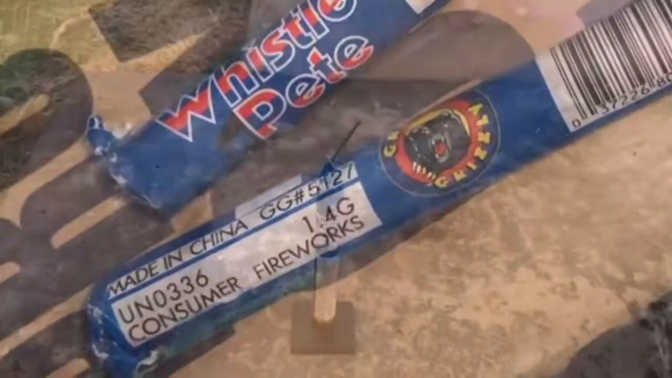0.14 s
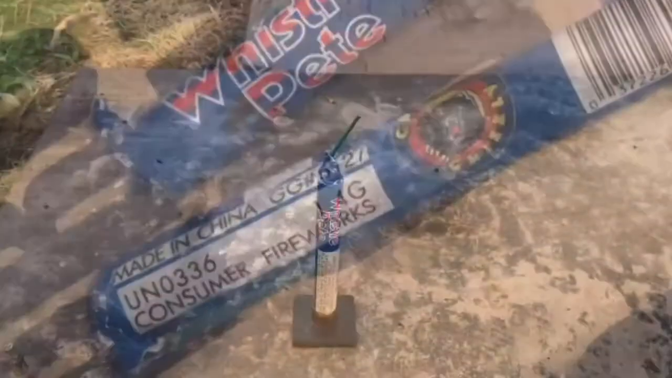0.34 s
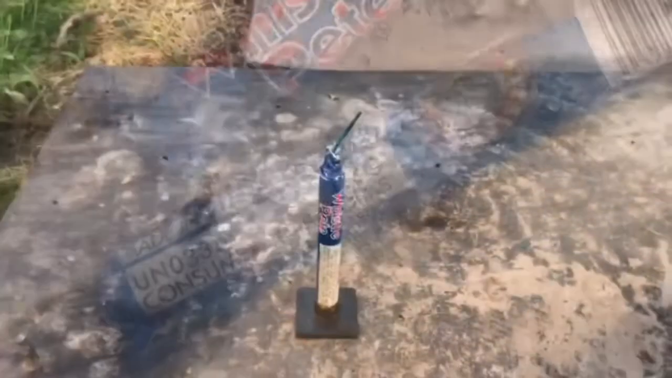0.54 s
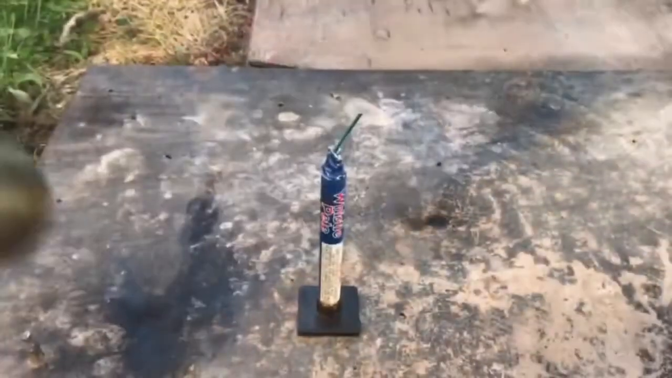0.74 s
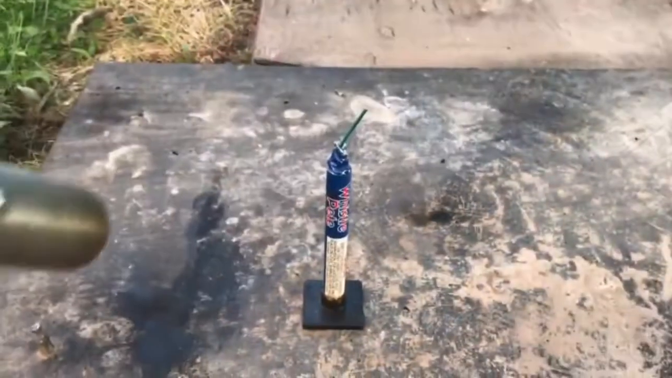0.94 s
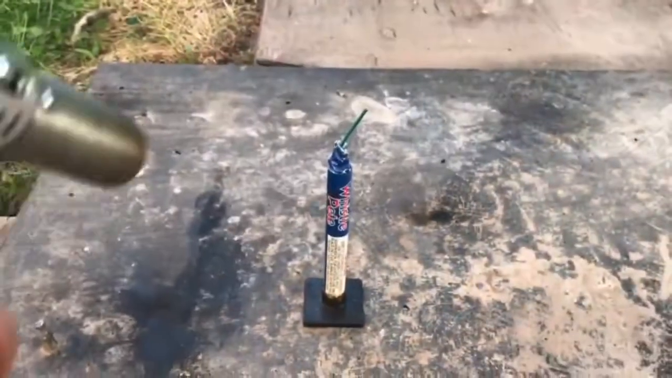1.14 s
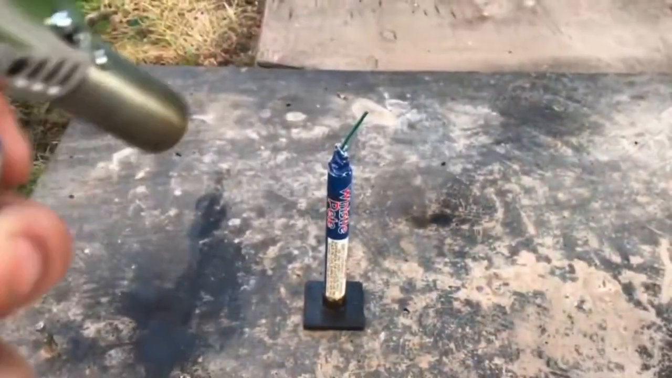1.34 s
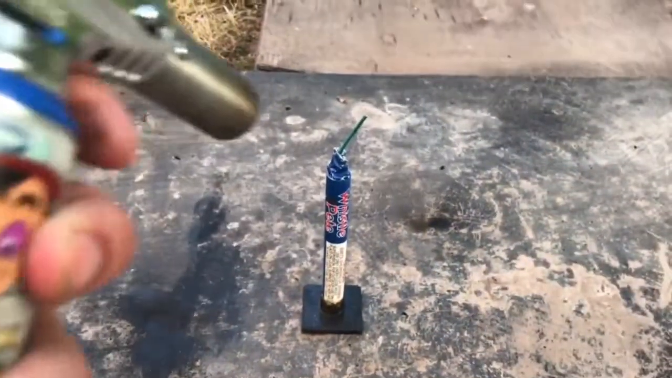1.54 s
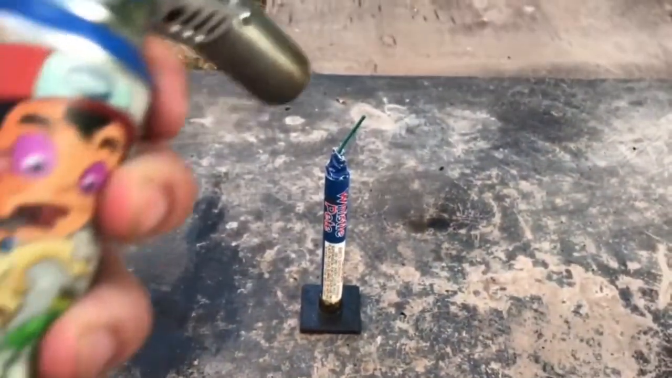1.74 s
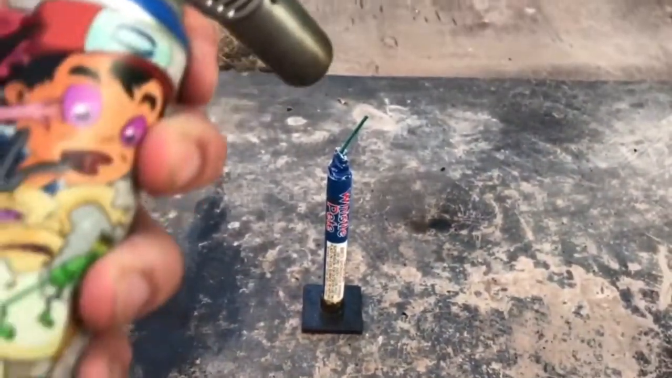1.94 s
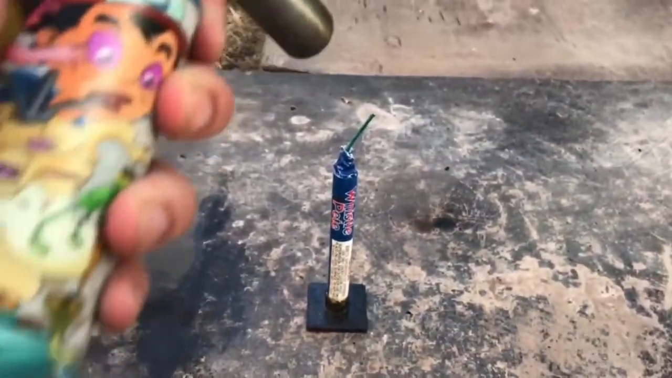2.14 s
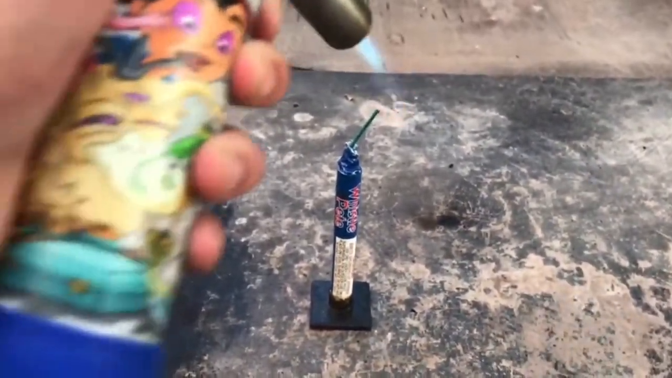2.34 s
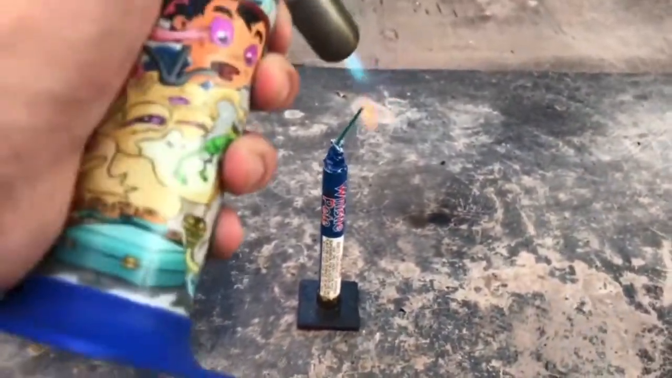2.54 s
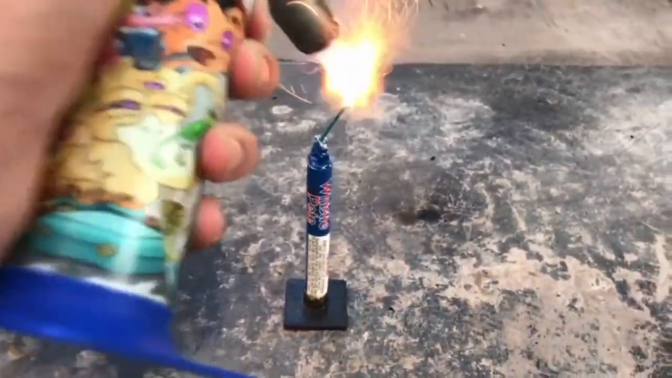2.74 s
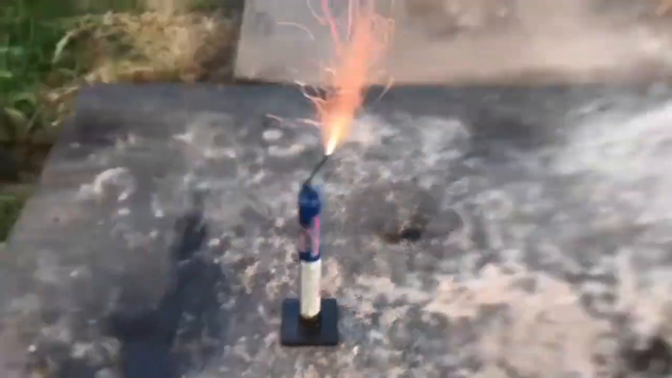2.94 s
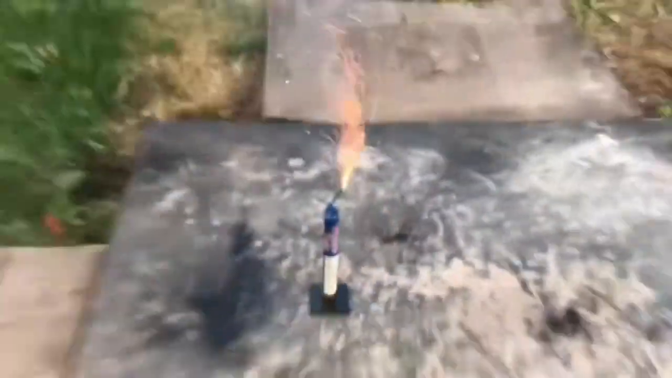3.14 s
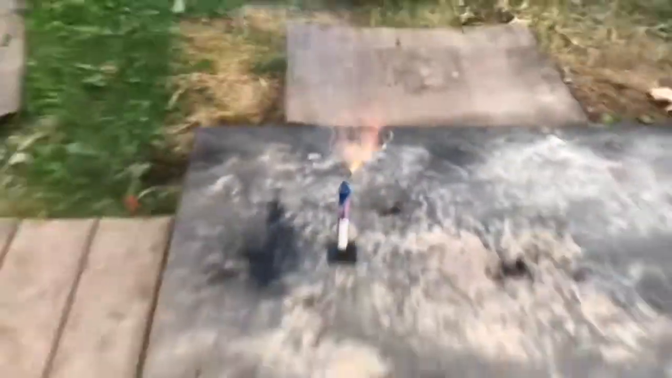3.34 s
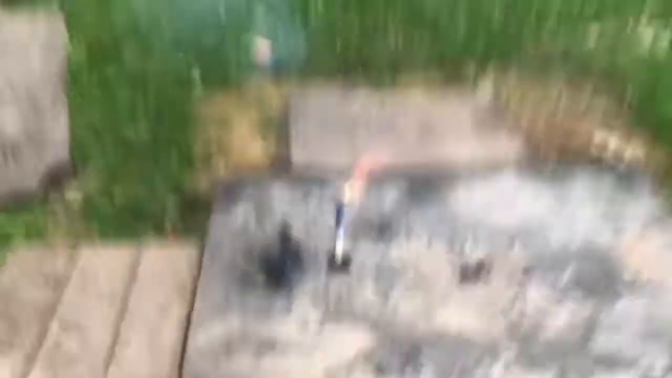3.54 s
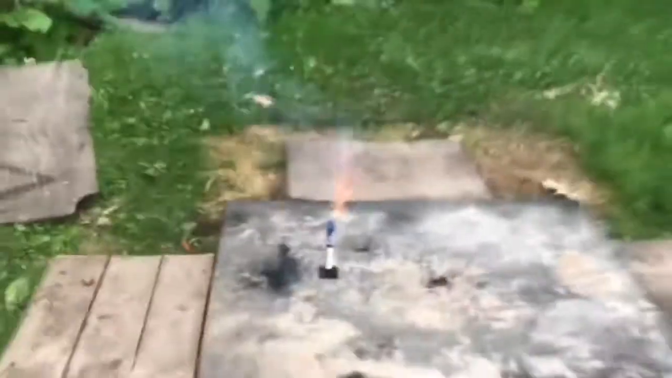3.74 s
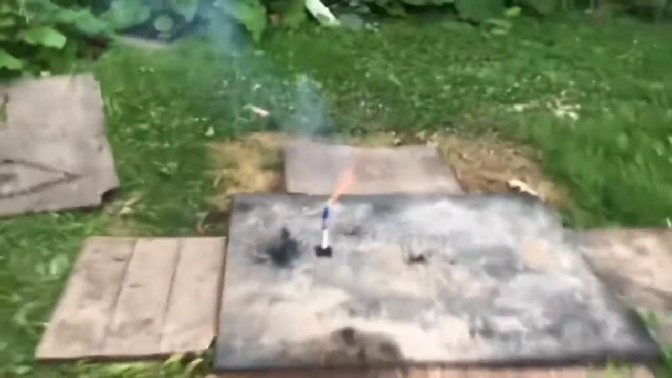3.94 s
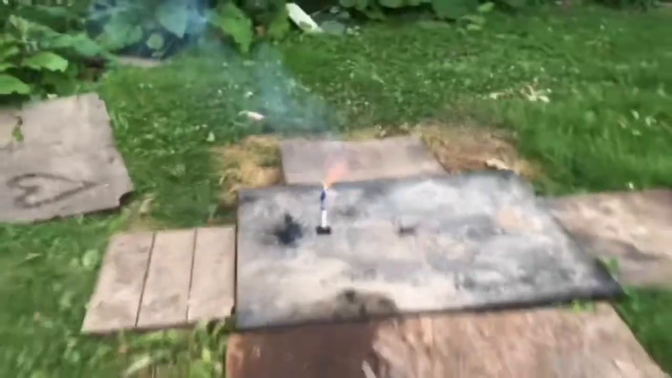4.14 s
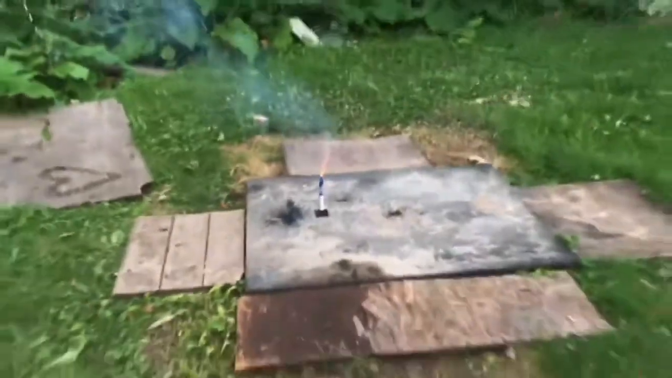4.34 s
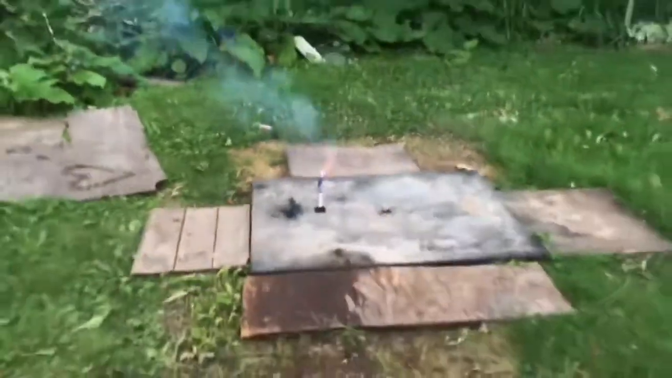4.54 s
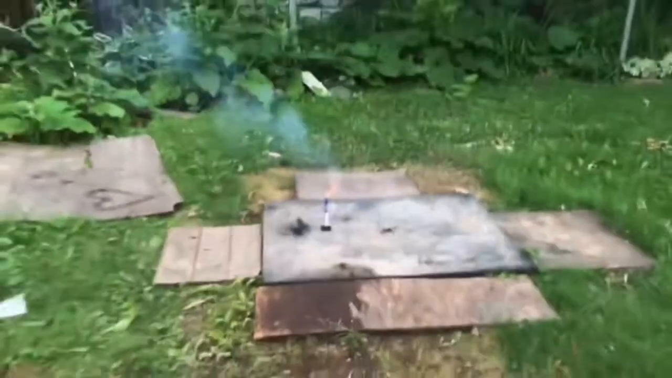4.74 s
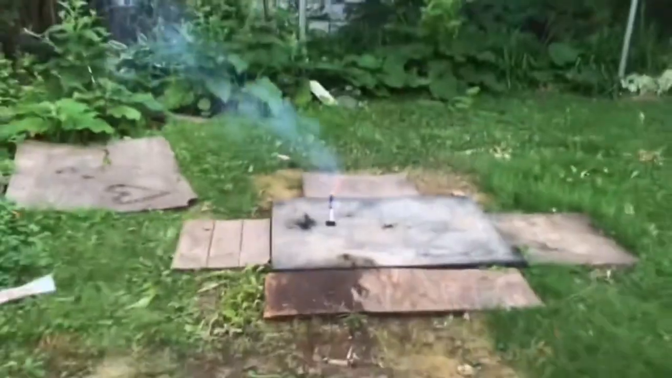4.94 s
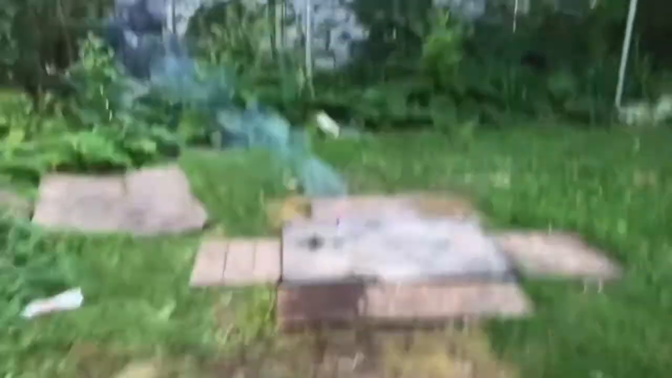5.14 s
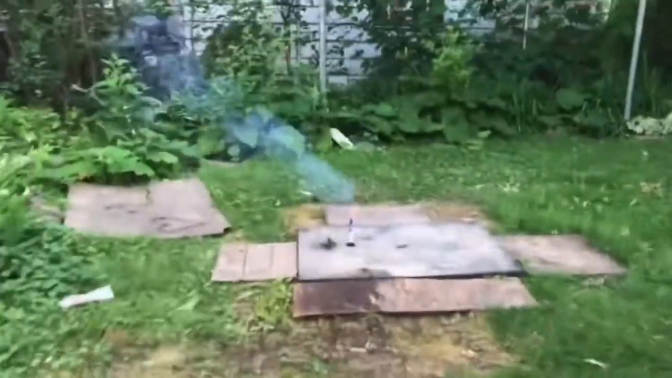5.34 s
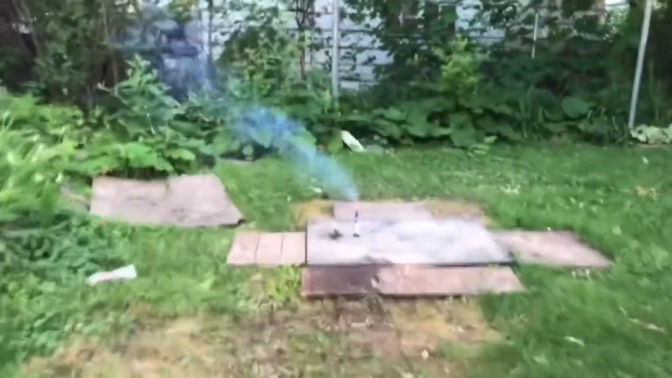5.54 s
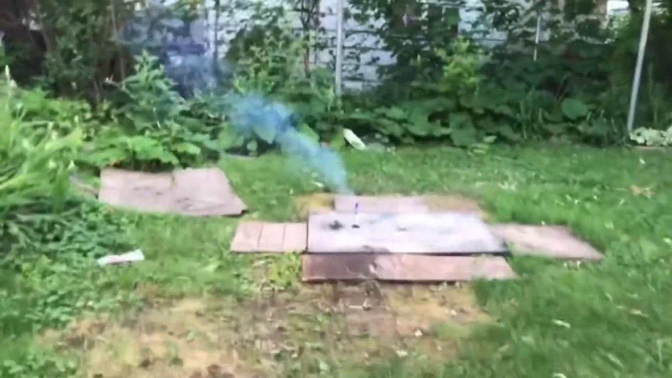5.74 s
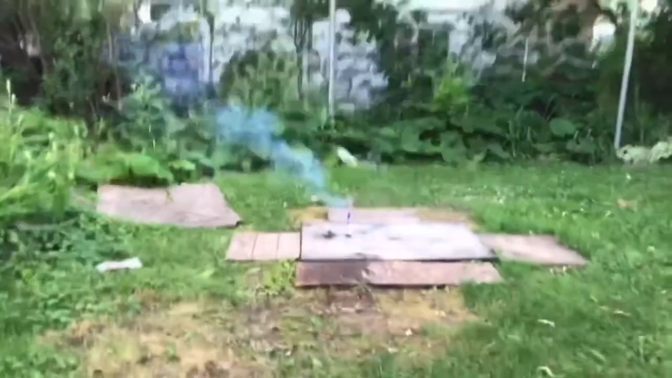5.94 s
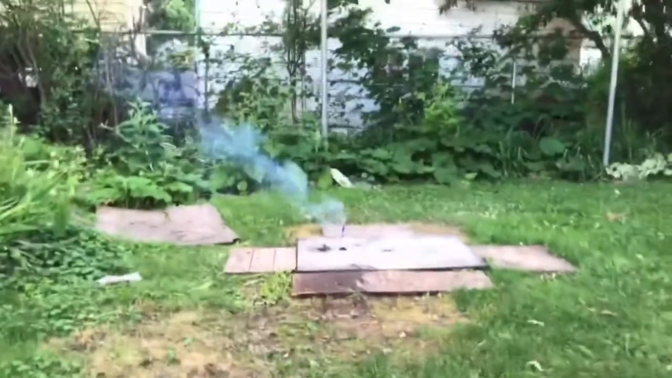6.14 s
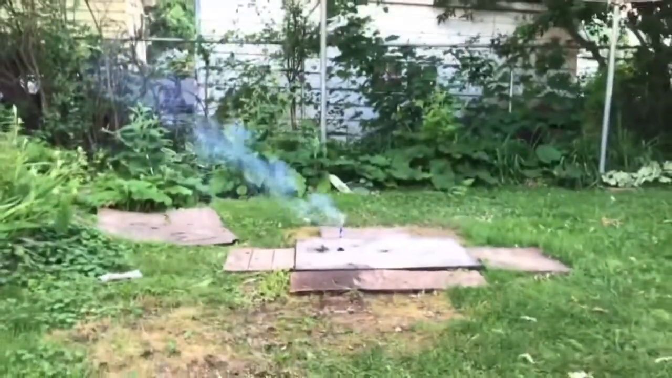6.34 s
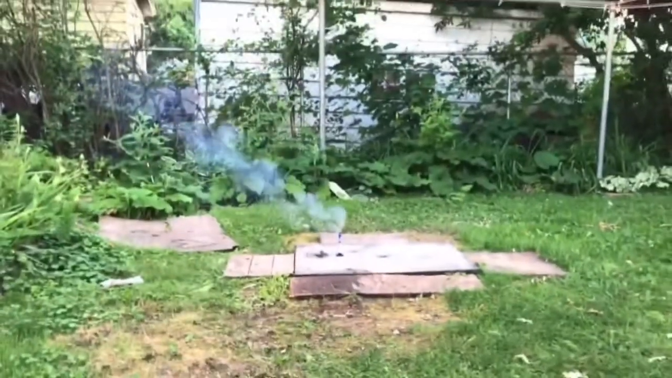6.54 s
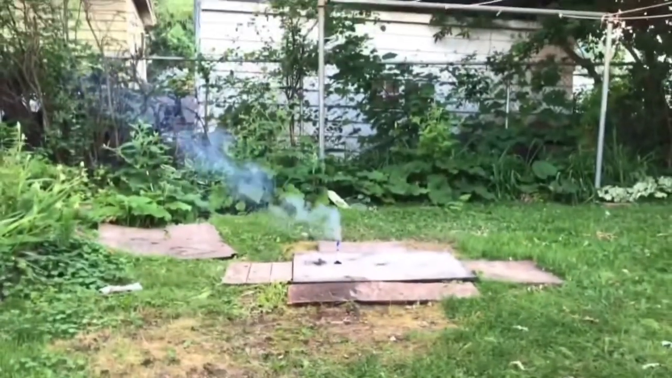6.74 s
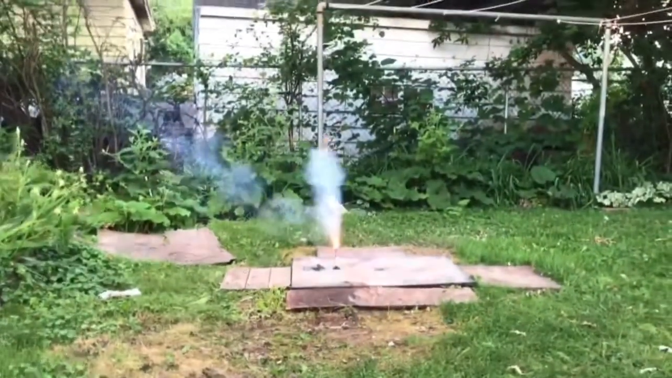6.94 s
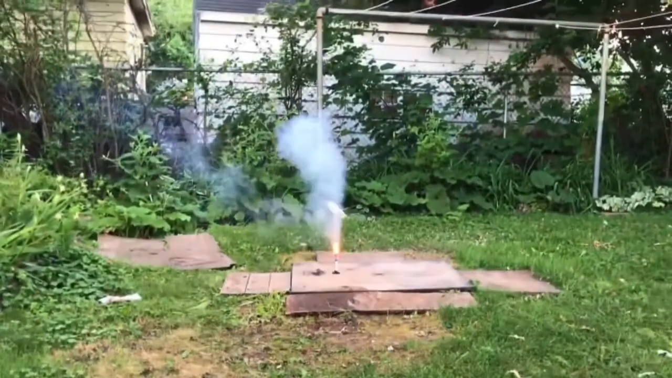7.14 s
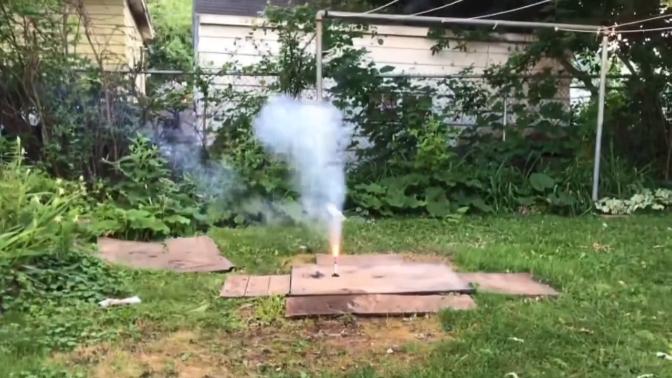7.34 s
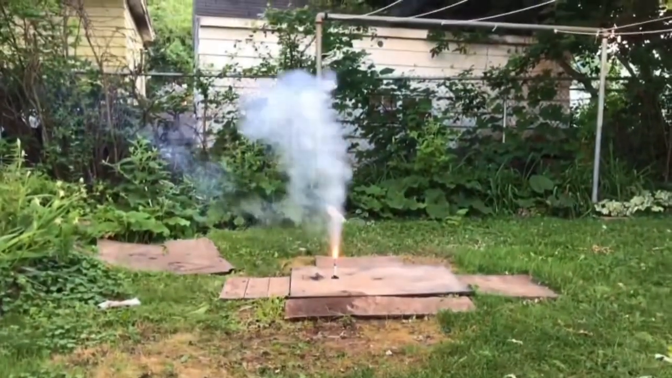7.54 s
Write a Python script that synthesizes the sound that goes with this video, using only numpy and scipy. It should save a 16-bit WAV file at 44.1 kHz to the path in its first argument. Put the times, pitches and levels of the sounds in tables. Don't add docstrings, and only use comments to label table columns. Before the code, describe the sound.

In a quiet backyard with low distant traffic rumble, a hand torch clicks sharply close to the microphone, hisses gas and catches with a soft thump and roar. A fuse sputters brightly, then fades as the listener steps back over boards and grass. A distant engine drones away. Suddenly the firework pops and screams a loud, high, wavering whistle that slides downward, with quick echoes from board, fence and walls.

```python
import sys
import numpy as np
from scipy import signal
from scipy.fft import rfft, irfft
from scipy.io import wavfile
from scipy.ndimage import uniform_filter1d, map_coordinates

SR = 44100
rng = np.random.default_rng(int(sys.argv[2]) if len(sys.argv) > 2 else 0)


def int16_out(signal):
    q = np.round(np.clip(np.atleast_2d(signal).T, -1, 1) * 32767)
    wavfile.write(sys.argv[1], SR, q.astype(np.int16))


def boost(x):
    u = np.asarray(x, float) / 20
    return 10 ** u


N = 335160
TIME = np.arange(N) / SR


def evened(x):
    return x / np.sqrt(np.mean(x ** 2) + 1e-20)


def colour(points, hz):
    f, db = np.transpose(points)
    return boost(np.interp(np.log(hz + 1), np.log(f), db, -120, -120))


def follow(rows, edge_s=0.005):
    s, *columns = np.transpose(rows)
    gate = np.clip(np.minimum(TIME - s[0], s[-1] + edge_s - TIME) / edge_s, 0, 1)
    return [np.interp(TIME, s, c) for c in columns] + [gate]


def wander(rate_hz):
    hz = np.fft.rfftfreq(N, 1 / SR)
    return evened(irfft(rfft(rng.standard_normal(N)) / (1 + (hz / rate_hz) ** 4), N))


def noise(points, patchy_db, flicker_db, size=512):
    frames = 4 * N // size + 5
    hz = np.fft.rfftfreq(size, 1 / SR)
    a, b, patches = rng.standard_normal((frames, len(hz), 3)).T
    patches = uniform_filter1d(patches, size=6, axis=0)
    patches = evened(uniform_filter1d(patches, size=16, axis=1))
    flicker = evened(uniform_filter1d(rng.standard_normal(frames), size=3))
    swing = boost(patchy_db * patches + flicker_db * flicker)
    z = (a + 1j * b) * colour(points, hz)[:, None] * swing
    return evened(signal.istft(z, nperseg=size, noverlap=size - size // 4)[1][:N])


def mode(hz, width, z):
    r = np.exp(-np.pi * width / SR)
    return (1 - r) / (1 - r * np.exp(2j * np.pi * hz / SR) * z)


def knocks(rows, middle_hz, bass_hz, treble_hz, top_hz, modes, spiky, mode_db, ring_width, ring_db):
    out = np.zeros(N + 4096)
    t = np.arange(4096) / SR
    lead = 200
    hz = np.fft.rfftfreq(len(t), 1 / SR)
    z = np.exp(-2j * np.pi * hz / SR)
    body = 1 + boost(mode_db) * sum(boost(db) * mode(f, width, z) for f, width, db in modes)
    for s, peak_db, bass_db, treble_db, ms, ring_hz in rows:
        hits = rng.standard_normal(len(t)) * rng.exponential(1, len(t)) ** spiky
        u = t * 1000 / max(ms, .3)
        hits *= np.exp(-2 * u ** 2) * np.minimum(t / .0012 + .15, 1)
        shape = [(bass_hz / 3, bass_db - 15), (bass_hz, bass_db + 1.5), (middle_hz, 0),
                 (treble_hz, treble_db + 1), (top_hz, treble_db - 2), (top_hz + 300, -70)]
        response = body + boost(ring_db) * mode(ring_hz, ring_width, z)
        knock = irfft(rfft(np.roll(hits, lead)) * response * colour(shape, hz))
        at = round(s * SR) - lead
        out[at:at + len(t)] += boost(peak_db) * knock / abs(knock).max()
    return out[:N]


def far_engine():
    # time in seconds, firing rate in Hz, level in dB.
    drone = [(1.7, 140.5, -67), (1.71, 141.8, -51), (2.02, 145.5, -58.5), (2.42, 140.2, -52),
             (2.45, 144.9, -49.5), (2.77, 136.4, -49.5), (3.57, 129.6, -46.5), (3.66, 129.9, -55.5),
             (3.93, 125.7, -54.5), (3.99, 124, -58), (4.09, 124.7, -50.5), (4.44, 122.3, -54),
             (4.6, 127.6, -63), (4.65, 118.9, -52), (4.77, 117.8, -95), (4.87, 109, -72),
             (5.07, 108.7, -58), (5.18, 114, -62), (5.33, 114.4, -55), (5.46, 118.5, -65),
             (5.62, 109.5, -62), (5.88, 114.0, -55.5), (5.97, 113.8, -54), (6.1, 111.9, -50.5),
             (6.33, 109.9, -61), (6.45, 114.3, -56), (6.68, 111.3, -49.5), (6.71, 108.1, -66),
             (6.8, 112.5, -64), (6.9, 110.8, -65)]
    # multiple, level in dB.
    orders = [(1, 2.5), (2, -7.5), (3, -19.5)]
    hz, level_db, gate = follow(drone, edge_s=0.19)
    turns = 2 * np.pi * np.cumsum(hz * (1 + 0.01213 * wander(7.77))) / SR
    engine = sum(boost(db + 3 * wander(4)) * np.sin(k * turns) for k, db in orders)
    return boost(level_db - 0.5) * gate * engine


def yard():
    # time in seconds, level in dB.
    rumble_curve = [(0.0, -66), (0.21, -56), (1.06, -48.5), (2.26, -48.5), (2.35, -41), (2.41, -44.5),
                    (2.58, -48.5), (2.62, -46), (2.86, -47.5), (2.92, -50.5), (3.09, -44.5), (3.15, -48),
                    (3.24, -41), (3.3, -52.5), (3.55, -41.5), (3.64, -55), (3.81, -51), (3.87, -47.5),
                    (3.94, -46), (3.98, -63), (4.09, -53), (4.25, -53), (4.32, -48.5), (4.4, -50),
                    (4.68, -50), (4.74, -56.5), (4.95, -47), (4.99, -53.5), (5.29, -50), (5.42, -53),
                    (5.88, -47.5), (5.97, -53), (6.1, -49.5), (6.35, -53.5), (6.5, -45.5), (6.56, -55),
                    (6.65, -47), (6.73, -50.5), (6.92, -47), (7.03, -60), (7.37, -62.5), (7.6, -61)]
    # frequency in Hz, density in dB per Hz.
    rumble_tone = [(15, -42), (25, -57), (49, 4.5), (139, 0.5), (215, -8), (288, -17.5), (325, -17),
                   (450, -28.5), (580, -54.5), (990, -120)]
    # time in seconds, gain in dB.
    gain_curve = [(0, -20), (.12, -13.5), (.25, -9.5), (.5, -4), (.9, 0.5), (1.3, 1.5), (3, 3), (4.5, 4),
                  (5.9, 3), (6.2, -0.5), (6.9, -1), (6.96, 14.5), (7.1, -1), (7.6, -2)]
    # frequency in Hz, density in dB per Hz.
    air_tone = [(150, -13), (250, -1), (287, -4.5), (451, -14.5), (708, -11.5), (2220, -19.5), (3620, -21),
                (4940, -24), (5680, -21.5), (14500, -37), (15800, -43)]
    # frequency in Hz, level in dB.
    machines = [(500, -76.5), (582, -74)]
    hums = sum(boost(db + 4.1 * wander(5.8)) * np.sin(2 * np.pi * f * TIME) for f, db in machines)
    hums = hums * (TIME < 2.3)
    air = boost(-62 + 0.53) * noise(air_tone, patchy_db=1.3, flicker_db=.5) + hums
    rumble_db, _ = follow(rumble_curve)
    rumble = boost(rumble_db - 3.0) * noise(rumble_tone, patchy_db=1.5, flicker_db=-0.14, size=4096)
    return rumble + boost(follow(gain_curve)[0]) * air


def footsteps():
    # time in seconds, peak in dB, bass in dB, treble in dB, scuff in ms, ring in Hz.
    steps = [(3.569, -39, -5, -17, 20.5, 500.4), (3.819, -37, -5, -2, 18, 504.5),
             (3.919, -32, -7, -15, 11, 700.3), (4.444, -37.5, -15, -23, 16.6, 916),
             (4.659, -37.5, 5, -20, 9, 280), (4.912, -45, -4, -28, 13, 700),
             (5.606, -35.5, -5, -14, 15, 966), (5.769, -38.5, 0, -12, 8, 990),
             (5.776, -37.5, 2, -14, 38, 330), (5.832, -38.5, -8, -12, 35, 1300)]
    return knocks(steps, middle_hz=1130, bass_hz=330, treble_hz=4500, top_hz=9200, modes=[], spiky=0.93,
                  mode_db=0, ring_width=320, ring_db=-3)


def taps_and_pop():
    # time in seconds, peak in dB, bass in dB, treble in dB, push in ms, ring in Hz.
    pushes = [
        (.546, -48, -6, -32, 1, 700),
        (.567, -43, -4, -30, 2.3, 615),
        (.586, -35.5, 2, -15, 1.6, 620),
        (4.02, -41, -12.5, -27, 3.6, 250),
        (6.9062, -6, -19, -13.5, 0.8, 1480),
    ]
    return knocks(pushes, middle_hz=900, bass_hz=300, treble_hz=5000, top_hz=15300, modes=[], spiky=.9,
                  mode_db=0, ring_width=160, ring_db=12)


def torch_clicks():
    # time in seconds, peak in dB, bass in dB, treble in dB, rattle in ms, ring in Hz.
    snaps = [(.718, -45, 1.5, -10, 3.2, 5000), (.739, -46, 3, -10, 4.5, 5500),
             (.859, -27.5, -5.5, -27, 9.6, 3340), (.910, -47, 12.5, -20, 13, 1330),
             (.934, -33.5, -2, -28, 6.4, 6140), (.956, -50, -12, -22, 3, 3600),
             (.986, -23.5, -15.5, -15.5, 7, 4170), (1.214, -48, 8, -23, 3, 1400),
             (1.356, -41, 17.5, -12, 3.3, 1000), (1.390, -19.5, 4, 1, 8, 2000),
             (1.3977, -3, -12.5, -6.5, 3.1, 3870), (1.404, -39, -15, -29, 21, 3380),
             (1.575, -23, -8.5, -5.5, 5.2, 2950), (1.607, -39, -8, -23, 4.8, 3700),
             (1.771, -48, -3.5, -25, 3, 2000), (1.8355, -42, -2, -26, 7.6, 2150),
             (2.331, -5, -9, -5, 6.6, 2640), (2.8775, -9, -1.5, -4, 5.05, 4292),
             (6.902, -13, 2, -4, 2.3, 4600)]
    # frequency in Hz, width in Hz, level in dB.
    body_modes = [(1300, 410, 0), (2000, 400, -6.5), (2890, 340, -7), (3930, 250, -9), (4400, 330, -13),
                  (6100, 530, -3), (7100, 500, 0)]
    clicks = knocks(snaps, middle_hz=3850, bass_hz=1180, treble_hz=10900, top_hz=16300, modes=body_modes,
                    spiky=1.0, mode_db=4, ring_width=110, ring_db=2)
    tail = rng.standard_normal(SR // 8) * boost(-61.5 - 60 * TIME[:SR // 8] / 0.19)
    return clicks + signal.oaconvolve(clicks, tail)[:N]


def torch():
    # time in seconds, level in dB.
    gas_curve = [(2.09, -72), (2.108, -56.5), (2.138, -52.5), (2.304, -55), (2.322, -54.5)]
    # frequency in Hz, density in dB per Hz.
    gas_tone = [(880, -47), (1500, -17), (2120, -16), (2380, -25), (3170, -9), (3500, -13), (3790, -10),
                (4430, -14), (5240, -10), (5670, 0), (8090, -6.5), (12600, -10), (15800, -20)]
    # time in seconds, level in dB.
    flame_curve = [(2.345, -42), (2.385, -45), (2.505, -46.5), (2.735, -43.5), (2.869, -41), (2.92, -56)]
    # frequency in Hz, density in dB per Hz.
    flame_tone = [(71, -40), (120, -5), (166, -13), (295, 1), (627, -18), (1020, -11), (1510, -14),
                  (1890, -27.5), (3560, -25), (5040, -34.5), (6300, -26), (7890, -33.5), (8920, -27),
                  (14600, -35.5), (15800, -31)]
    gas_db, gas_gate = follow(gas_curve)
    gas = boost(gas_db) * gas_gate * noise(gas_tone, patchy_db=.8, flicker_db=.4)
    u = np.maximum(TIME - 2.336, 0) * 85
    thump = boost(-24.5) * np.sin(2 * np.pi * u) * np.exp(-1.3 * u)
    flame_db, flame_gate = follow(flame_curve, edge_s=0.0082)
    flame = boost(flame_db + 2.5) * flame_gate * noise(flame_tone, patchy_db=1.3, flicker_db=.9)
    return gas + thump + flame


def fuse():
    # time in seconds, level in dB, treble in dB.
    burn = [(2.66, -60, -2), (2.77, -42, -6), (2.85, -47.5, -6), (2.89, -39.5, -0.5), (2.98, -39, -0.5),
            (3.07, -41.5, 1), (3.21, -43, -2.5), (3.41, -46.5, 0.5), (3.57, -46, 0), (3.68, -49.5, -6),
            (3.73, -49, -0.5), (3.97, -49.5, -2), (4.16, -50.5, -1.5), (4.17, -52.5, -5.5), (4.4, -52.5, 1),
            (4.51, -53, 0.5), (4.56, -55.5, -2.5), (4.72, -57.5, -3.5), (4.83, -60, -1), (5.1, -58.5, -1),
            (5.22, -63, 3), (5.3, -58, 0), (5.44, -62, -0.5), (5.55, -60.5, 2), (5.65, -64, -4),
            (5.86, -73, 5), (6.13, -59, -3.5), (6.22, -56.5, 3.5), (6.43, -60, -6), (6.64, -59.5, -2),
            (6.89, -58.5, -4.5)]
    # frequency in Hz, density in dB per Hz.
    fizz_tone = [(500, -10), (1000, -5.5), (2000, -4.5), (3000, -3.5), (4000, -2.5), (5000, -4), (5800, -1),
                 (6800, -2.5), (7750, -5), (7950, -50)]
    # frequency in Hz, density in dB per Hz.
    top_tone = [(7750, -66), (7950, -2.5), (9300, 0), (10500, -2.5), (12500, 1.5), (15600, -2),
                (15800, -48)]
    # time in seconds, lag in ms, strength from 0 to 1.
    ground = [(2.7, .685, .5), (3.2, .648, .5), (3.4, .592, .55), (3.6, .536, .65), (4.0, .445, .7),
              (4.2, .385, .8), (4.4, .35, .85), (4.6, .33, .9), (5.0, .292, .9), (5.4, .255, .85),
              (5.8, .205, .8), (6.12, .19, .8), (6.22, .165, .75), (6.9, .165, .75)]
    level_db, top_db, gate = follow(burn, edge_s=.04)
    lag_ms, strength, _ = follow(ground)
    sputter = boost(level_db + 2.0 + 0.79 * wander(64)) * gate
    dance = wander(13)
    strength = strength * (.9 + .16 * dance)
    late = [np.arange(N) - (lag_ms + .005 * dance) * SR / 1000]
    fizz = noise(fizz_tone, patchy_db=1.5, flicker_db=.4, size=256)
    top = boost(top_db) * noise(top_tone, patchy_db=1.3, flicker_db=.5, size=256)
    echo = map_coordinates(fizz + .3 * top, late, order=3)
    return sputter * ((fizz + strength * echo) / np.sqrt(1 + strength ** 2) + top)


def whistle():
    # time in seconds, tone in dB, jet in dB, jet treble in dB relative to the tone.
    levels = [(6.908, -14.5, -22, -11), (6.916, -11, -24.5, -24), (6.938, -12, -22.5, -15),
              (6.974, -12, -24, -20), (7.008, -14, -28.5, -17), (7.018, -13, -29, -19),
              (7.08, -19.5, -33, -18.5), (7.244, -17, -30, -18), (7.268, -16, -31, -20),
              (7.508, -18.5, -30, -19), (7.6, -19.5, -29, -16.5)]
    # time in seconds, pitch in Hz.
    pitch = [(6.908, 5400), (6.94, 5450), (6.968, 5530), (6.985, 5460), (7.012, 5550), (7.06, 5545),
             (7.11, 5460), (7.122, 5400), (7.162, 5490), (7.185, 5400), (7.21, 5530), (7.235, 5545),
             (7.28, 5480), (7.3, 5420), (7.385, 5420), (7.43, 5325), (7.53, 5220), (7.6, 5095)]
    # time in seconds, dip in dB, pitch kick in Hz.
    stumbles = [(6.9115, -5, -260), (6.98, -5, -30), (7.007, -5, 50), (7.114, -1, 120), (7.121, -5, -50),
                (7.166, -5, 100), (7.198, -8, 60), (7.222, -7, 100), (7.284, -3, 180), (7.35, -4, 70),
                (7.398, -5, -80), (7.45, -6, -70), (7.46, -5, -80), (7.475, -7, -80), (7.504, -6, -50),
                (7.57, -7, -70), (7.59, -6, -40)]
    # frequency in Hz, density in dB per Hz.
    jet_tone = [(200, -36), (1240, -24.5), (1600, -30), (2300, -12.5), (2650, -17), (3050, -11.5),
                (3400, -14.5), (3800, -7.5), (4400, -10.5), (5400, -7.5), (6300, -10.5), (6700, -15),
                (7750, -8), (7900, -40)]
    # frequency in Hz, density in dB per Hz.
    jet_top = [(7750, -40), (7900, 4), (9500, 2.5), (10500, -7), (12400, -4.5), (13200, -9), (14500, -6),
               (15700, -12.5), (15850, -50)]
    # time in seconds, level in dB.
    twin_curve = [(6.91, -50), (7.0, -44), (7.06, -44), (7.12, -52), (7.22, -46), (7.35, -44), (7.5, -40),
                  (7.6, -38)]
    # lag in ms, level in dB.
    walls = [(.82, -28), (1.3, -28), (4.79, -23), (7.94, -11), (10.08, -15), (10.45, -9.5), (10.75, -30),
             (45, -26)]
    hz, gate = follow(pitch, edge_s=0.0022)
    tone_db, jet_db, top_db, _ = follow(levels)
    lit = follow([(6.899, 0), (8, 0)], edge_s=.02)[1]
    jet = lit * boost(jet_db + 2.0) * noise(jet_tone, patchy_db=0.7, flicker_db=0.1)
    top = lit * boost(tone_db + top_db) * noise(jet_top, patchy_db=-0.8, flicker_db=0.9)

    for s, dip_db, kick_hz in stumbles:
        blip = np.exp(-((TIME - s) / .0022) ** 2)
        tone_db = tone_db + dip_db * blip
        hz = hz + kick_hz * blip
    turns = 2 * np.pi * np.cumsum(hz + 9 * wander(45) + 42 * wander(300)) / SR
    tone = gate * boost(tone_db + 3.0 + 0.83 * wander(56) + 0.77 * wander(600)) * np.sin(turns)
    twin_turns = turns + 2 * np.pi * 7620 * TIME
    twin = gate * boost(follow(twin_curve)[0] + 1.5 * wander(40)) * np.sin(twin_turns)

    returns = rng.standard_normal(SR // 4) * boost(-53 - 60 * TIME[:SR // 4] / 0.64)
    for ms, db in walls:
        returns[round(ms * SR / 1000)] += boost(db)
    echoes = signal.oaconvolve(jet + boost(-11.5) * tone, returns)[:N]
    return tone + twin + jet + top + echoes


def scene():
    background = yard() + far_engine() + footsteps()
    handling = taps_and_pop() + torch_clicks() + torch()
    return (background + handling + fuse() + whistle())[None]


def band_limit(x):
    return signal.sosfilt(signal.butter(12, 16690, fs=SR, output="sos"), x)


def record(dry):
    limited = dry / (1 + (abs(dry) / .72) ** 6) ** (1 / 6)
    return band_limit(limited)


dry = scene()
out = record(dry)
int16_out(out)
```